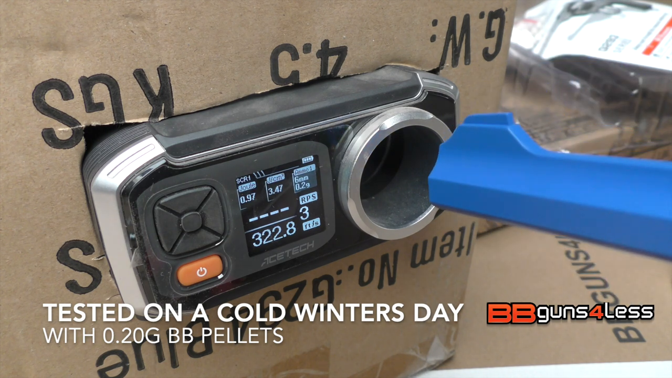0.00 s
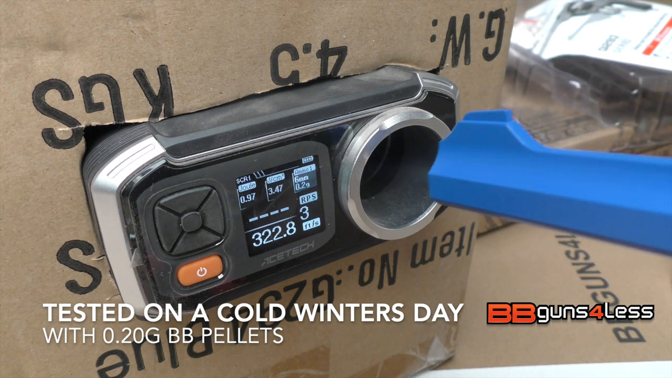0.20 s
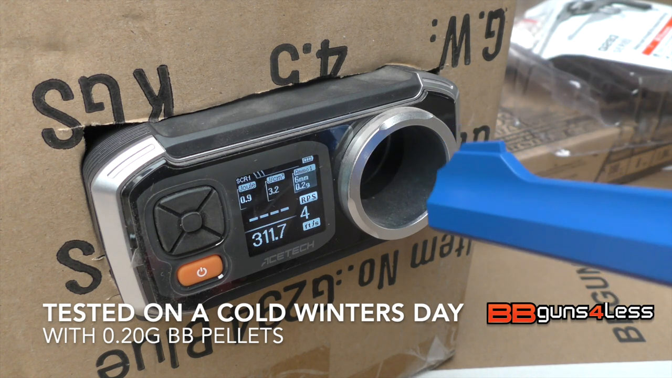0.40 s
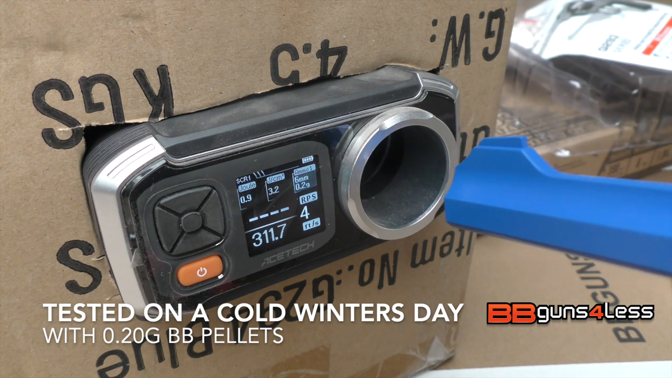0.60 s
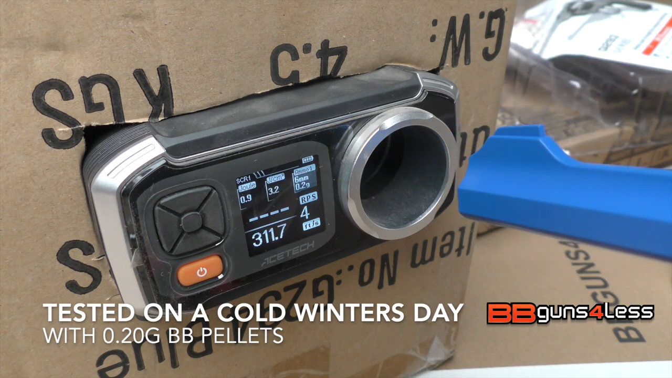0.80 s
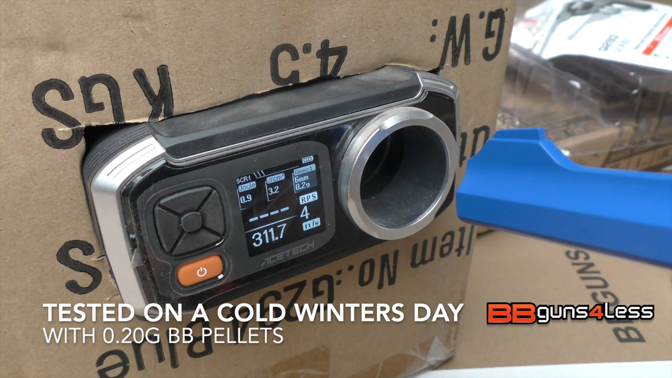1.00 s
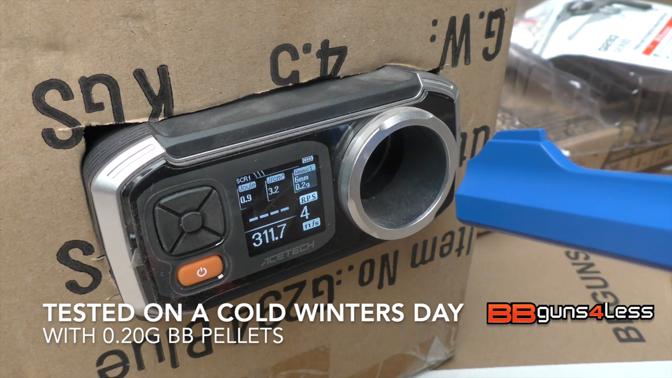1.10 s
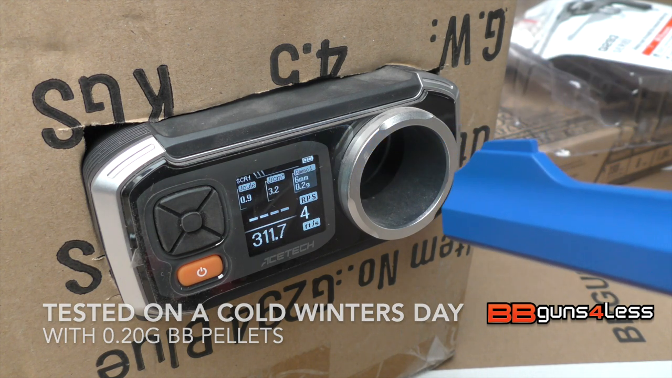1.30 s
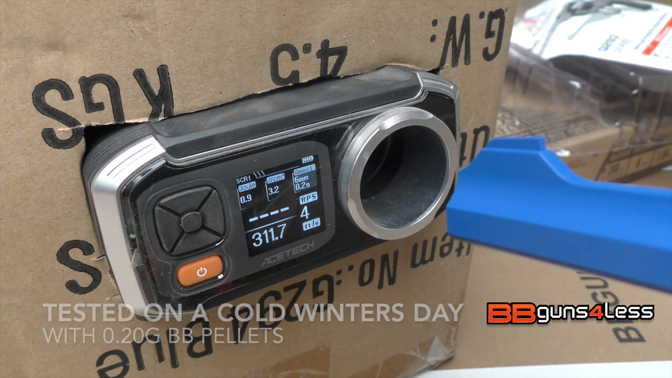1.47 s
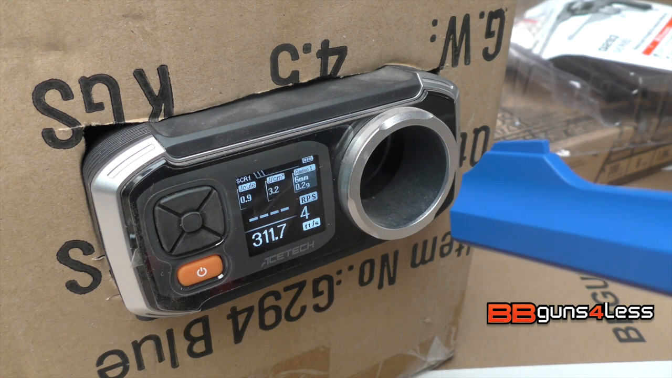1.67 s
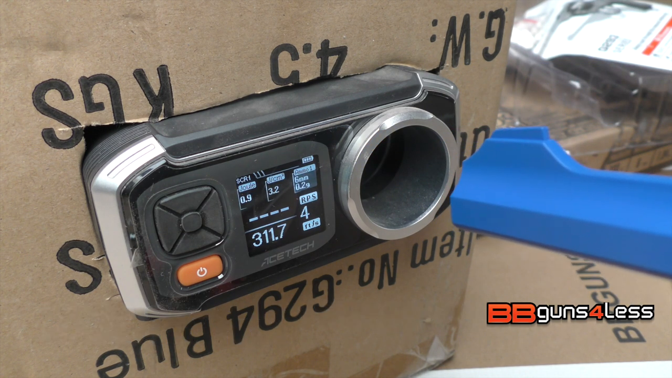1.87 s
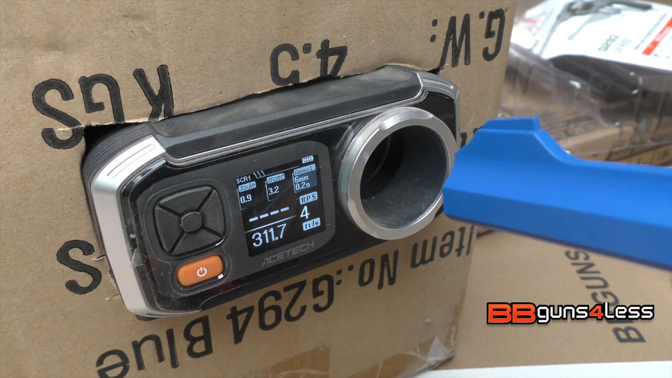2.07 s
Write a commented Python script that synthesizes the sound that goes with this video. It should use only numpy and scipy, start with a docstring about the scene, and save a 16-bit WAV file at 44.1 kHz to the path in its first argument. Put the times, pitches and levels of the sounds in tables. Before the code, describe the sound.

One loud airsoft revolver shot hits a cardboard box, then trigger click, hall echo and faint handling

```python
"""Ventilation rumble comes first; then a gas-powered air revolver cracks close by in a large hard-walled shop.
Hammer, gas blast and pellet strike, within 30 ms, are shaped noise bursts with decaying modes of metal and cardboard.
The pellet bounces off the box, the trigger snaps back, and noise fading at its own rate per frequency is the hall.
A hand on the grip rustles, ticks and squeaks softly; gain control ducks all sound on loud cracks."""
import sys
import numpy as np
from scipy import signal
from scipy.fft import rfft, irfft, next_fast_len
from scipy.io import wavfile
from scipy.ndimage import uniform_filter1d, minimum_filter1d

SR = 44100
rng = np.random.default_rng(int(sys.argv[2]) if len(sys.argv) > 2 else 0)


def to_linear_factor(level_db):
    """Convert decibel levels (scalar or array-like) to linear amplitude factors."""
    exponent = np.asarray(level_db, float) / 20
    return 10 ** exponent


def master_out(mix):
    """Clip the mix to full scale and print it as 16-bit PCM to the path in sys.argv[1]."""
    frames = np.transpose(np.atleast_2d(mix))
    ceiling = np.clip(frames, -1, 1)
    pcm = np.round(ceiling * 32767).astype(np.int16)
    wavfile.write(sys.argv[1], SR, pcm)


N = 92610

# Noise bursts: (time [s], level [dB], rise [s], hold [s], 60 dB decay time [s])
HAMMER_BURSTS = [(.2059, -11, .0002, 0.00073, 0.0068), (.208, -21, 0.00082, 0.0082, 0.0091)]
BLAST_BURSTS = [(.2160, -1, 0.0005, 0.0038, 0.012)]
LAST_GAS_BURSTS = [(.2215, -2.5, .001, 0.0034, 0.072)]
TRIGGER_BURSTS = [(.4025, -19.5, .002, 0.00085, 0.025), (.4099, -8.5, 0.00015, 0.0004, 0.014)]
STRIKE_BURSTS = [(.2307, 0.0063, 0.00013, 0.0016, .007)]
BOUNCE_BURSTS = [(.3185, -19.5, .003, 0.0062, 0.081), (.3234, -16.5, .0002, 0.0005, 0.008),
                 (.345, -34, 0.021, 0.052, .02)]

# Spectra of the noises: (frequency [Hz], relative level [dB])
HAMMER_SPECTRUM = [(300, -48), (900, -28.5), (1650, -0.5), (3800, 0.5), (5600, -14), (7500, -6),
                   (9900, 0.5), (12000, -12), (16000, -21.5)]
BLAST_SPECTRUM = [(400, -28), (900, -18), (1400, -3), (2800, -5.5), (4000, -7.5), (6000, -9), (7500, -11),
                  (10900, 0.5), (14000, -8.5), (16200, -13.5)]
LAST_GAS_SPECTRUM = [(400, -27.5), (1200, 6), (2500, 4), (4000, -1), (6000, 1), (7500, -12.5), (10500, -3),
                     (16000, -20)]
TRIGGER_SPECTRUM = [(500, -44), (1200, -29), (1700, -5.5), (3000, -4.5), (6500, -3.5), (8000, 0),
                    (10000, -2.5), (13600, -2), (16000, -21.5)]
STRIKE_SPECTRUM = [(500, -27), (1500, -6), (2800, -1), (4200, -10), (6000, -4.5), (7200, -10), (10500, -8),
                   (14000, -4), (16000, -19.5)]
BOUNCE_SPECTRUM = [(200, -36), (350, -18.5), (750, -20.5), (1200, 1), (1500, -6.5), (3500, -16),
                   (7800, -11), (9500, -20.5), (16000, -28)]
HAND_SPECTRUM = [(700, -25.5), (1300, 1), (2000, -6), (2800, -6), (3800, -6.5), (5500, -15.5), (11800, -18),
                 (16000, -24)]
TICK_SPECTRUM = [(1000, -18.5), (1800, -3), (4500, -14), (6500, -38)]
AIR_SPECTRUM = [(12, -61), (20, -9), (43, -10), (70, -4), (150, -4.5), (216, -11.5), (293, -11.5),
                (446, -18.5), (624, -27.5), (698, -22), (897, -22), (1120, -16.5), (1220, -16.5),
                (1760, -20.5), (4300, -39.5), (12400, -35), (16000, -34.5)]

# Ringing modes: (frequency [Hz], level [dB], rise [s], 60 dB decay time [s])
FRAME_MODES = [(10000, -15.5, .004, 0.02), (3970, -13.5, .0003, 0.017), (1580, -17.5, 0.00068, 0.011)]
BARREL_MODES = [(2778, 1, 0.0062, 0.0042), (2817, -18.5, .01, .3), (4010, 1, 0.00048, .008),
                (5880, -4, 0.0022, 0.02), (1340, -7, 0.002, 0.025), (1150, -12, .004, 0.065)]
STAND_MODES = [(110, -34.5, 0.0022, 0.017)]
BOX_MODES = [(83.3, -13.5, 0.0014, .04), (131, -29.5, .004, 0.16), (166, -8, 0.0024, .035),
             (222, -7.5, 0.0034, .03), (312, -14.5, 0.0018, 0.051), (362, -1.5, 0.0016, 0.02),
             (461, -8.5, 0.003, 0.0065), (630, -19, .002, .015)]
# a plastic tube struck by the bouncing pellet
TUBE_MODES = [(1156, -28, .004, 0.045), (332, -29.5, 0.009, .03)]
CYLINDER_MODES = [(2870, 0.89, 0.00084, 0.0094), (2340, 0.89, 0.00044, 0.0078),
                  (1920, -0.5, 0.0012, 0.0064)]
# the blast wave crossing the two microphone ports
SHOVE_MODES = [(75, -9.5, .002, .06)]

# Blows of gas and pellet on the box: (time [s], level [dB])
BOX_BLOWS_AT = [(.2183, 3), (0.2314, -0.5)]
# Rustle of the hand moving on the grip: (time [s], level [dB])
HAND_LEVEL = [(.12, -81.5), (.19, -54.5), (.2, -88.5), (1.04, -84), (1.12, -57), (1.24, -61), (1.32, -67.5),
              (1.67, -72), (1.69, -62), (1.76, -61), (1.8, -65.5), (1.83, -60.5), (1.92, -62), (2.1, -65)]
# Cylinder ticks: (time [s], ring level [dB], crack level [dB])
CYLINDER_TICKS = [(1.7713, -39, -60), (1.9008, -50, -47)]
# Trigger springs taking load: (time [s], length [s], frequency [Hz], level [dB])
SPRING_SQUEAKS = [(1.703, .045, 11500, -72), (1.67, .1, 2900, -61)]
# Reverberation of the hall: (frequency [Hz], level [dB], 60 dB decay time [s])
HALL_DECAY = [(150, -35, 0.62), (358, -22.5, 0.59), (820, -26, 0.98), (1180, -17, 1.3), (1520, -13, 1.1),
              (1760, -17.5, 1), (2260, -15.5, 1.3), (2810, -12, 1.24), (2963, -17.5, 1.245),
              (4500, -12.5, 0.93), (5560, -14, .8), (5850, -12.5, 0.85), (7000, -18, 0.69),
              (12000, -17, 0.54), (16000, -24, .4)]

# Left-right likeness: (frequency [Hz], likeness [0 to 1])
NEAR_LIKENESS = [(60, .9), (550, 0.43), (1650, 0.82), (15000, 1)]
HALL_LIKENESS = [(60, 0.67), (240, 0.77), (950, 0.61), (3770, 0.77), (15000, 0.52)]
AIR_LIKENESS = [(60, 0.87), (150, 0.82), (380, 0.74), (950, 0.98), (2380, 0.19), (5980, 0.4), (15000, 0.45)]
# Left-right balance: (frequency [Hz], left minus right [dB])
NEAR_BALANCE = [(60, 8), (150, 4.5), (380, -5.5), (950, -1), (2380, -3), (5980, -1.5), (12000, -2.5)]
HALL_BALANCE = [(60, 1.5), (950, -2), (15000, -0.5)]
AIR_BALANCE = [(60, 4.5), (180, 1.5), (550, -1.5), (1650, -0.5), (4970, -0.5), (15000, 1)]
# Phase by which left leads right: (frequency [Hz], lead [rad])
NEAR_PHASE_LEAD = [(40, 1.2), (100, 1), (200, 0.86), (350, 0.45), (700, 1.8), (1400, 1.6), (2800, .5)]

HAMMER_S, BLAST_S = HAMMER_BURSTS[0][0], BLAST_BURSTS[0][0]
BOUNCE_S, TRIGGER_S = BOUNCE_BURSTS[0][0], TRIGGER_BURSTS[1][0]
SQUEAK_SKIRT_HZ = 1000  # distance from the centre at which a squeak is 40 dB down
HALL_DELAY_S, HALL_BUILD_S = 0.02, 0.0033
AIR_DB, MIC_LOW_HZ = -53.5, 44.75
DUCK_FROM_DB, DUCK_SLOPE, RECOVER_DB_PER_S = -30, 0.6, 88
SENSE_S, ATTACK_S, HOLD_S = 0.0043, 0.004, 0.011


def unit(x):
    """Normalization: dividing by the root mean square gives rms 1."""
    return x / np.sqrt(np.mean(x ** 2) + 1e-20)


def along(points, hz, axis=1):
    """Interpolation of one table column along a logarithmic frequency axis."""
    columns = np.transpose(points)
    return np.interp(np.log(hz + 1), np.log(columns[0] + 1), columns[axis])


def filtered(x, response):
    """Linear filtering: the spectrum is multiplied by a complex frequency response."""
    length = next_fast_len(N + SR // 2)
    spectrum = rfft(x, length) * response(np.fft.rfftfreq(length, 1 / SR))
    return irfft(spectrum, length)[..., :N]


def lagged(x, seconds):
    """First-order relaxation: the output approaches its input exponentially."""
    keep = np.exp(-1 / (seconds * SR))
    return signal.lfilter([1 - keep], [1, -keep], x)


def ports(pair, likeness, balance, lead=((1, 0),)):
    """Interchannel coherence: two sounds mix to left and right with set likeness, balance and phase lead."""
    def common_and_opposed(hz):
        angle = np.arccos(np.clip(along(likeness, hz), 0, 1)) / 2
        return np.array([np.cos(angle), np.sin(angle)])

    def left_and_right(hz):
        half = to_linear_factor(along(balance, hz) / 2) * np.exp(.5j * along(lead, hz))
        return np.array([half, 1 / half])

    mid, side = filtered(pair, common_and_opposed)
    return filtered(np.array([mid + side, mid - side]), left_and_right)


def hiss(spectrum):
    """Turbulence as coloured noise: two independent white noises are filtered, with joint rms 1."""
    white = rng.standard_normal((2, N))
    return unit(filtered(white, lambda hz: to_linear_factor(along(spectrum, hz))))


def bursts(rows, spectrum):
    """Transient excitation: coloured noise rises linearly, holds, then decays exponentially."""
    t = np.arange(N) / SR
    envelope = 0
    for start, db, rise, hold, t60 in rows:
        decay_db = -60 * np.clip(t - start - rise - hold, 0, None) / t60
        envelope = envelope + to_linear_factor(db + decay_db) * np.clip((t - start) / rise, 0, 1)
    return envelope * hiss(spectrum)


def ring(start, db, modes):
    """Modal vibration: damped sinusoids are driven up from one moment, then left to die."""
    t = np.clip(np.arange(N) / SR - start, 0, .5)
    total = 0
    for hz, level, rise, t60 in modes:
        decay_db = -60 * np.clip(t - rise, 0, None) / t60
        envelope = to_linear_factor(db + level + decay_db) * np.clip(t / rise, 0, 1) ** .5
        total = total + envelope * np.sin(2 * np.pi * hz * t)
    return total


def revolver():
    """Impact and jet noise: hammer, gas and trigger burst, exciting modes of frame, barrel and stand."""
    noise = bursts(HAMMER_BURSTS, HAMMER_SPECTRUM) + bursts(BLAST_BURSTS, BLAST_SPECTRUM)
    noise = noise + bursts(LAST_GAS_BURSTS, LAST_GAS_SPECTRUM) + bursts(TRIGGER_BURSTS, TRIGGER_SPECTRUM)
    modes = ring(HAMMER_S, 0, FRAME_MODES) + ring(BLAST_S, 0, BARREL_MODES)
    modes = modes + ring(TRIGGER_S, 0, STAND_MODES)
    return noise + [[1], [0]] * modes  # modes enter only the first sound of the pair


def box():
    """Impact on a light panel: gas and pellet thump the cardboard; the bouncing pellet rings a tube."""
    thump = sum(ring(start, db, BOX_MODES) for start, db in BOX_BLOWS_AT)
    thump = thump + ring(BOUNCE_S, 0, TUBE_MODES)
    cracks = bursts(STRIKE_BURSTS, STRIKE_SPECTRUM) + bursts(BOUNCE_BURSTS, BOUNCE_SPECTRUM)
    return cracks + [[1], [0]] * thump


def shove():
    """Pressure gradient: the blast wave crossing the ports gives left and right opposite signs."""
    return [[1], [-1]] * ring(BLAST_S, 0, SHOVE_MODES)


def cylinder_ticks():
    """Small impacts: each tick joins a brief noise crack to the cylinder's damped modes."""
    tones = sum(ring(start, db, CYLINDER_MODES) for start, db, _ in CYLINDER_TICKS)
    crack_rows = [(start, db, .0003, .001, .008) for start, _, db in CYLINDER_TICKS]
    return [[1], [.3]] * tones + bursts(crack_rows, TICK_SPECTRUM)


def spring_squeaks(grain):
    """Narrow-band friction: noise around one frequency swells and fades in a half-sine arch."""
    t = np.arange(N) / SR
    total = 0
    for start, length, hz, db in SPRING_SQUEAKS:
        arch = np.sin(np.pi * np.clip((t - start) / length, 0, 1))
        band = [(hz - SQUEAK_SKIRT_HZ, -40), (hz, 0), (hz + SQUEAK_SKIRT_HZ, -40)]
        total = total + to_linear_factor(db) * grain * arch * hiss(band)
    return total


def hand():
    """Sliding friction: irregular grain modulates rustle and squeaks; the cylinder ticks."""
    t = np.arange(N) / SR
    grain = to_linear_factor(2 * unit(uniform_filter1d(rng.standard_normal(N), size=300)))  # 2 dB rms
    rustle = to_linear_factor(np.interp(t, *np.transpose(HAND_LEVEL))) * grain * hiss(HAND_SPECTRUM)
    return rustle + cylinder_ticks() + spring_squeaks(grain)


def hall():
    """Diffuse reverberation: a dense noise tail follows the blast, each frequency decaying at its own rate."""
    hz, t, noise = signal.stft(rng.standard_normal((2, N + SR)), SR, nperseg=256)
    age = np.clip(t - BLAST_S - HALL_DELAY_S, 0, None)
    level_db = along(HALL_DECAY, hz)[:, None]
    t60 = along(HALL_DECAY, hz, axis=2)[:, None]
    envelope = to_linear_factor(level_db - 60 * age / t60) * (1 - np.exp(-age / HALL_BUILD_S))
    tail = signal.istft(noise * envelope, SR, nperseg=256)[1][:, :N]
    return ports(tail, HALL_LIKENESS, HALL_BALANCE)


def air():
    """Steady flow noise: ventilation rumble and hiss whose level wanders by 0.3 dB rms."""
    swell = unit(uniform_filter1d(rng.standard_normal(N), size=3000))
    return to_linear_factor(AIR_DB + 0.3 * swell) * ports(hiss(AIR_SPECTRUM), AIR_LIKENESS, AIR_BALANCE)


def scene():
    """Superposition: near sounds, the blast's shove, hand, hall and air add linearly."""
    near = ports(revolver() + box(), NEAR_LIKENESS, NEAR_BALANCE, NEAR_PHASE_LEAD)
    grip = ports(hand(), HALL_LIKENESS, HALL_BALANCE)
    return near + shove() + grip + hall() + air()


def gain_control(x):
    """Dynamic compression: gain falls on loud sound, holds, then climbs back at a constant rate."""
    level_db = 10 * np.log10(lagged(np.mean(x ** 2, axis=0), SENSE_S) + 1e-12)
    duck_db = -DUCK_SLOPE * np.clip(level_db - DUCK_FROM_DB, 0, None)
    hold = int(HOLD_S * SR) | 1
    held_db = minimum_filter1d(duck_db, size=hold, origin=hold // 2)  # looks back only
    climb_db = RECOVER_DB_PER_S * np.arange(N) / SR
    gain_db = climb_db + np.minimum.accumulate(held_db - climb_db)
    return x * to_linear_factor(lagged(gain_db, ATTACK_S))


def band_limit(x):
    """A steep low-pass at the top of the band."""
    return signal.sosfilt(signal.butter(12, 15790, fs=SR, output="sos"), x)


def record(dry):
    """Transduction: the microphone loses deep bass, gain control ducks, and peaks saturate smoothly."""
    heard = filtered(dry, lambda hz: (1j * hz / (MIC_LOW_HZ + 1j * hz)) ** 2)
    levelled = gain_control(heard)
    mix = levelled / (1 + np.abs(levelled) ** 6) ** (1 / 6)  # soft clipping
    return band_limit(mix)


dry = scene()
out = record(dry)
master_out(out)
```